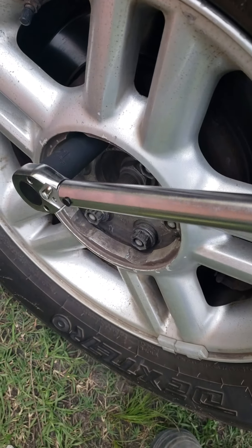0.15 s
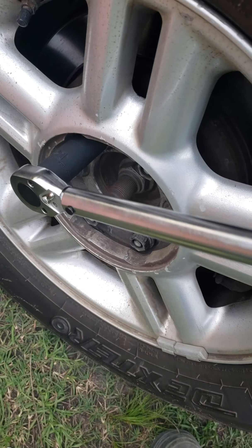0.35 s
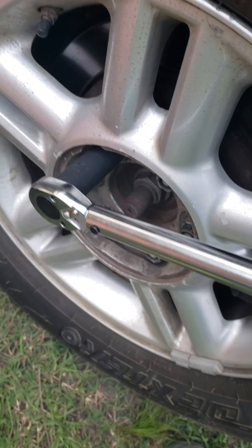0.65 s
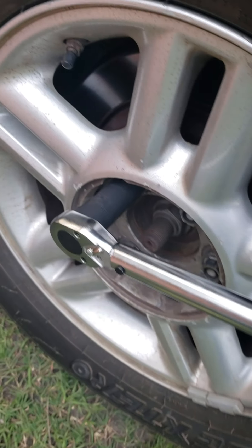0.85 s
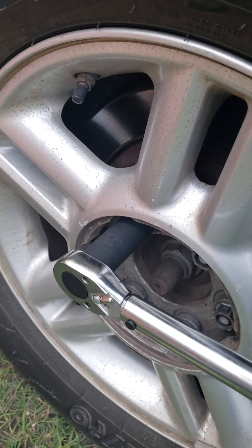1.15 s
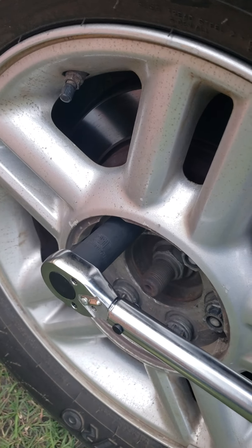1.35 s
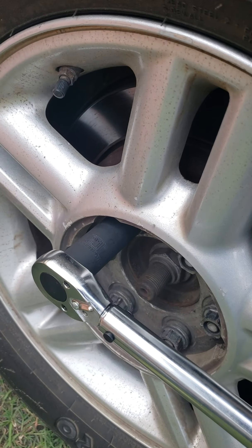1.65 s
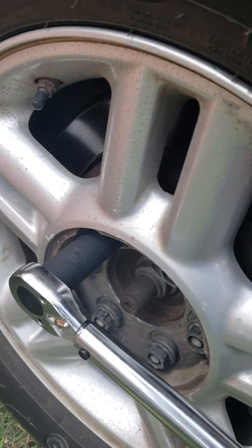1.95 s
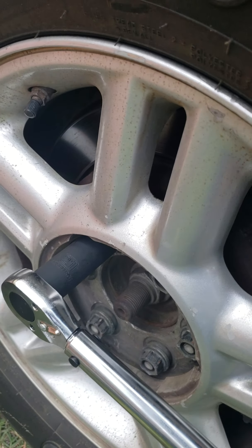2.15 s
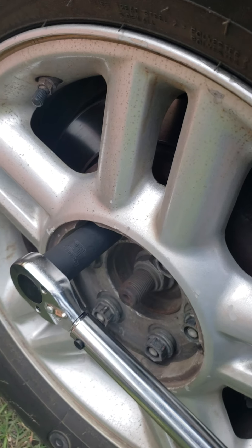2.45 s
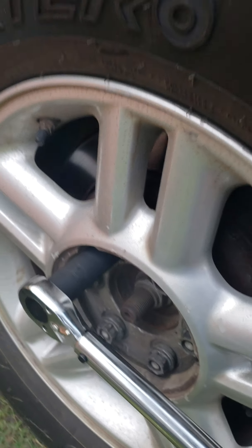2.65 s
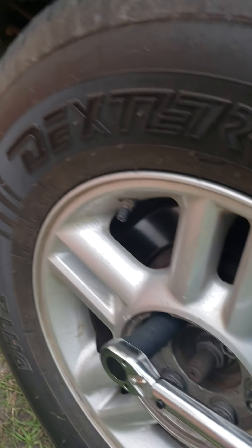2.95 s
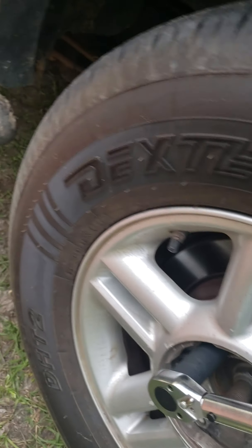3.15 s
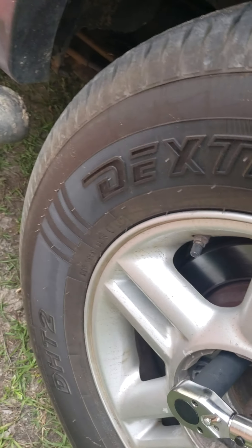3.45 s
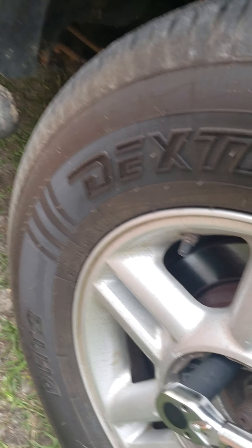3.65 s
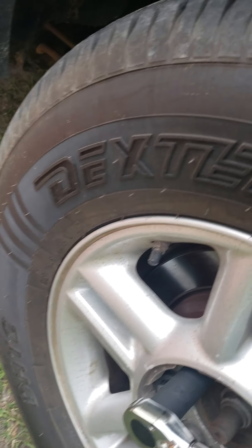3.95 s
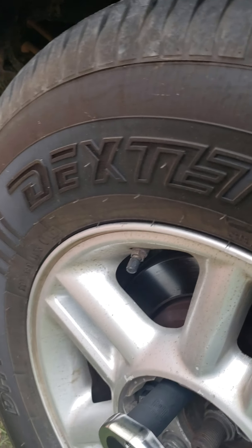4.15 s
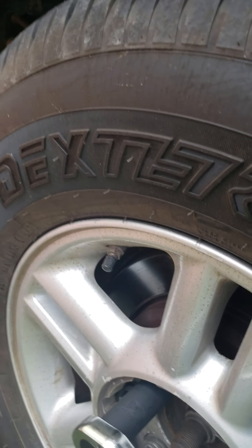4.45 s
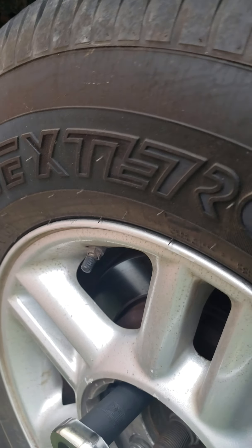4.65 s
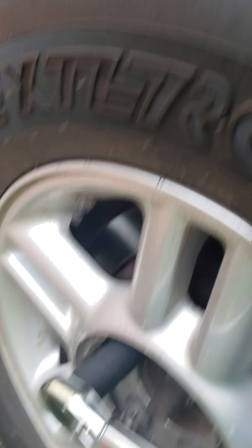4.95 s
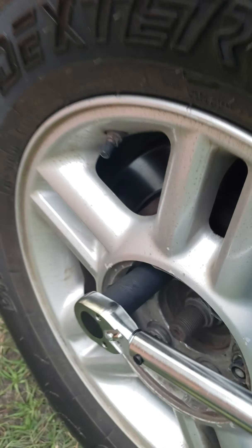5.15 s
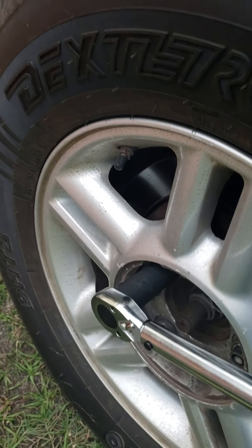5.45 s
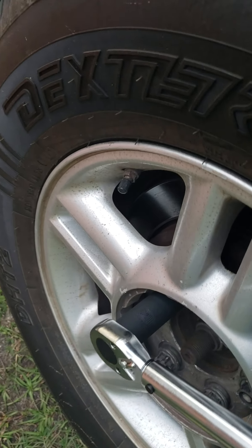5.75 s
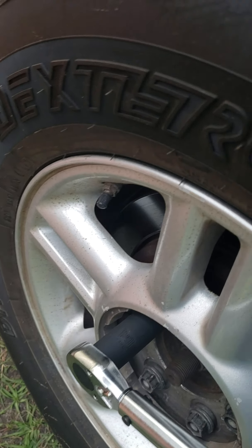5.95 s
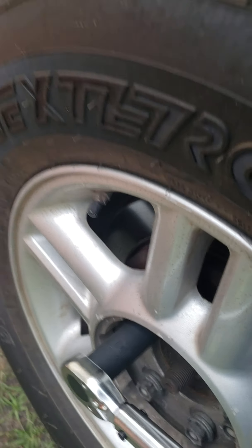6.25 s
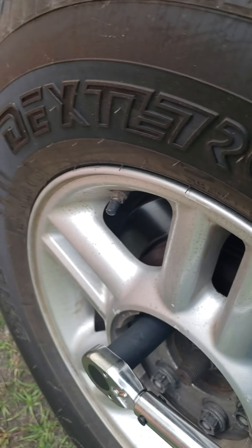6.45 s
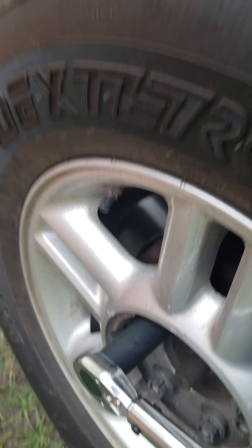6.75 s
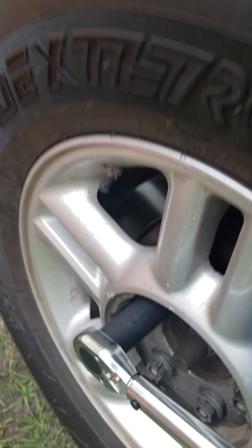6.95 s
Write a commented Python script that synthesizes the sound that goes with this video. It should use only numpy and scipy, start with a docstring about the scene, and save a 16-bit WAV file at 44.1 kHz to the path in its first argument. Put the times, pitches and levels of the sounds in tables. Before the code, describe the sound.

Sharp steel clinks and soft cloth rustling outdoors, until a torque wrench clacks loudly on a car wheel, briefly ringing it.

```python
"""A click-type torque wrench tightens a wheel nut and gives way with a loud clack that rings the wheel.
Before that, the socket scrapes and squeaks and the steel ratchet clinks as the handle is turned and
reset. A sleeve rustles close to a hand-held phone, with a few dull knocks and one dry snap near the end.
It all happens outdoors, over a low rumble and far traffic."""
import sys
import numpy as np
from scipy import signal
from scipy.fft import rfft, irfft, next_fast_len
from scipy.io import wavfile

SR = 44100
rng = np.random.default_rng(int(sys.argv[2]) if len(sys.argv) > 2 else 0)


def wrap_up_sound(samples):
    """Save the sound to the file named by the first command line argument, as 16-bit audio."""
    columns = np.atleast_2d(samples).T
    # keep every value between -1 and 1, then stretch to whole-number steps
    tamed = np.clip(columns, -1, 1)
    steps = np.round(tamed * 32767).astype(np.int16)
    wavfile.write(sys.argv[1], SR, steps)


N = 313683
T = np.arange(N) / SR
RING_TIME = T[:3 * SR // 5]  # time for each blow to die away
STEEL_PEAKS_DB, PEAK_GAP_HZ = 5, 71.03  # how uneven the many tones of struck steel are, and their spacing


# the wrench gives way and bounces (t/s, level/dB)
CLACK_HITS = [(6.101, 0.5), (6.1036, -10.5), (6.104, -15), (6.1089, -11.5), (6.112, -9.5), (6.1218, -22.5),
              (6.134, -27.5)]
# tone colour of the clack: how strong it is from low to high (f/Hz, level/dB)
CLACK_COLOUR = [(120, -23), (230, -17.5), (330, -1), (450, -11.5), (600, -8.5), (1000, -7), (1300, -10.5),
                (1750, -1.5), (2500, -1.5), (3400, -7), (4300, -2), (5000, -10), (8600, -6.5), (10200, 5.5),
                (11800, 1.5), (13000, -9), (16000, -7)]
# tone colour of the clack's tail (f/Hz, level/dB)
TAIL_COLOUR = [(150, -12.5), (320, -1), (850, 3), (1300, -7), (1900, -2), (3000, -3.5), (3400, -11.5),
               (4300, -3.5), (5000, -12.5), (10500, -7.5), (16000, -16)]
# tone colour of the hub's faint after-ring (f/Hz, level/dB)
HUB_COLOUR = [(2500, -27), (2900, -7.5), (3400, -17.5), (4000, -3.5), (4450, 1.5), (5000, -19.5),
              (8000, -33.5)]
# tones of the struck wheel; decay is the time to fade by 60 dB (f/Hz, level/dB, decay/s)
WHEEL_TONES = [(314, -17, 0.38), (387, -20, 0.44), (507, -8, 0.2), (581, -20, 0.77), (586, -22.5, 0.37),
               (567.5, 5, 0.077), (657, -1, 0.11), (750, -16.5, 0.2), (866, -5, 0.28), (1190, -19, 0.33),
               (1720, -3, 0.18), (2180, -6, 0.088), (2880, -17.5, 0.38), (3010, -12, 0.2),
               (3830, -7.5, 0.1), (4120, -9, .12), (4350, -11, .14), (4480, -5.5, 0.1)]
# tones of a dull thud, also heard in the knocks (f/Hz, level/dB, decay/s)
THUD_TONES = [(309.4, -1, 0.065), (333, -1, 0.07), (594, -10, 0.088), (800, -24, 0.14)]
def wrench_clack():
    """Once the nut is tight, a lever slams into the wrench's tube and chatters; the jolt rings the wheel."""
    out = np.zeros((2, N))
    for s, db in CLACK_HITS:
        contact = undb(-5.5) * burst(CLACK_COLOUR, t60=0.0089, rise=0.00013)
        crack = undb(-8) * burst(CLACK_COLOUR, t60=0.034, rise=0.00025)
        add(out, s, undb(db) * (contact + crack))
    wheel = undb(-23.5) * ring(WHEEL_TONES, rise=0.0038)
    tail = undb(-21.5) * burst(TAIL_COLOUR, t60=0.16, rise=0.0063, peaky_db=STEEL_PEAKS_DB)
    hub = undb(-47) * burst(HUB_COLOUR, t60=0.45, peaky_db=5.5)
    thud = undb(-14) * ring(THUD_TONES, rise=0.0076)
    add(out, CLACK_HITS[0][0], wheel + tail + hub + thud)
    return out


# steel clinks; the last four columns add to the level (t/s, level/dB, body/dB, pawl/dB, socket/dB, nut/dB)
RATCHET_CLINKS = [(0.0499, -52.5, 4, -35, -47, -32), (2.903, -27, -7.5, -21.5, -50.5, -42.5),
                  (3.0117, -17, -0.5, -32, -40.5, -24.5), (3.0214, -8, -4.5, -19.5, -28, -25),
                  (3.1366, -24, 4, -19.5, -37.5, -29), (3.149, -8.5, -5.5, -19.5, -22, -38),
                  (3.409, -55, 11, -15, -35, -35), (3.514, -39, 7, -8.5, -42, -45)]
# loose parts bounce, too briefly to ring (t/s, level/dB)
BOUNCES = [(3.0132, -17.5), (3.0146, -20), (3.0165, -19.5), (3.0305, -25.5), (3.1335, -34), (3.1538, -20.5),
           (3.161, -24.5), (3.517, -38), (3.548, -46)]
# light touches that ring the tool (t/s, level/dB)
TOUCHES = [(3.477, -56), (4.346, -61.5)]
# tone colour of a clink's bright crack (f/Hz, level/dB)
BRIGHT_COLOUR = [(2000, -41), (5000, -11), (8500, -12), (10000, -11.5), (11800, 4), (13200, -6.5),
                 (15000, 1), (17000, -19)]
# tone colour of a clink's duller body (f/Hz, level/dB)
BODY_COLOUR = [(300, -20.5), (800, -12), (1300, -17), (2200, 1), (3500, -4), (5000, 1.5), (7000, -8),
               (11000, -2.5), (16000, 0.5)]
# tones of the pawl, the small catch that grips the ratchet's teeth (f/Hz, level/dB, decay/s)
PAWL_TONES = [(1270, -28.5, .09), (2474, -24.5, 0.17), (2563, -22.5, .12), (9740, -6, 0.14),
              (9840, 1, 0.053), (10560, 0, 0.037), (11750, -10.5, 0.063)]
# tones of the socket, the cup that fits over the nut (f/Hz, level/dB, decay/s)
SOCKET_TONES = [(860, -21.5, 0.27), (2440, -12, 0.11), (3300, -17.5, 0.11), (3790, -6.5, 0.11),
                (3810, -16.5, .16), (4440, 0, 0.13)]
# tones of the wheel nut (f/Hz, level/dB, decay/s)
NUT_TONES = [(5082, -13, 0.38), (5238, -5, 0.09), (5300, -6.5, .08)]
# tones of the whole tool (f/Hz, level/dB, decay/s)
TOOL_TONES = [(3940, -16, 0.27), (6510, -2.5, 0.15), (9500, -11, 0.088), (13600, 6, 0.11)]
def ratchet():
    """Steel hits steel and bounces: a bright crack, a duller body, and pawl, socket and nut ringing."""
    out = np.zeros((2, N))
    for s, db, body_db, pawl_db, socket_db, nut_db in RATCHET_CLINKS:
        contact = undb(4.5) * burst(BRIGHT_COLOUR, t60=0.0063, rise=0.0003)
        crack = undb(-3) * burst(BRIGHT_COLOUR, t60=0.02, rise=0.00042)
        crack += undb(-19) * burst(BRIGHT_COLOUR, t60=0.088, peaky_db=STEEL_PEAKS_DB)
        body = undb(-17) * burst(BODY_COLOUR, t60=0.016)
        body += undb(-18.5) * burst(BODY_COLOUR, t60=0.14, rise=0.0041, peaky_db=STEEL_PEAKS_DB)
        pawl = undb(pawl_db) * ring(PAWL_TONES)
        socket = undb(socket_db) * ring(SOCKET_TONES, rise=0.014)
        nut = undb(nut_db) * ring(NUT_TONES)
        add(out, s, undb(db) * (contact + crack + undb(body_db) * body + pawl + socket + nut))
    for s, db in BOUNCES:
        contact = undb(3.5) * burst(BRIGHT_COLOUR, t60=0.008)
        body = undb(-17) * burst(BODY_COLOUR, t60=0.03)
        add(out, s, undb(db) * (contact + body))
    for s, db in TOUCHES:
        add(out, s, undb(db) * (ring(TOOL_TONES) + burst(BODY_COLOUR, t60=0.16)))
    return out


# single ratchet clicks; the last two columns add to the level (t/s, level/dB, ring/dB, body/dB)
TOOTH_CLICKS = [(1.2423, -40.5, 1, -10), (4.1326, -41.5, 5, -6.5)]
# tone colour of the pawl's crack (f/Hz, level/dB)
PAWL_COLOUR = [(1000, -33), (2400, -21.5), (3700, -7), (4600, -12), (5600, -15), (8300, -13), (9300, 0),
               (10600, 3), (12300, 2.5), (13000, -9), (16000, -13)]
def pawl_clicks():
    """The pawl drops over one tooth and rings."""
    out = np.zeros((2, N))
    for s, db, ring_db, body_db in TOOTH_CLICKS:
        crack = undb(7.5) * burst(PAWL_COLOUR, t60=0.03, rise=0.00046)
        tail = undb(-8.5) * burst(PAWL_COLOUR, t60=0.16, peaky_db=STEEL_PEAKS_DB)
        pawl = undb(ring_db) * ring(PAWL_TONES)
        body = undb(body_db) * burst(BODY_COLOUR, t60=0.02)
        add(out, s, undb(db) * (crack + tail + pawl + body))
    return out


# the socket taps the nut (t/s, level/dB)
SOCKET_TAPS = [(0.419, -69), (0.4605, -60), (0.4758, -51)]
# tones of each tap (f/Hz, level/dB, decay/s)
PING_TONES = [(603, -8.5, 0.18), (870, -14.5, 0.32), (2780, 1, 0.034), (3860, -6, 0.1), (3950, 1, .02),
              (5950, -5, .022)]
# tone colour of a gritty scrape, also heard in the knocks (f/Hz, level/dB)
GRIT_COLOUR = [(150, -0.5), (350, -6.5), (700, 6.5), (1050, -3.5), (1600, 2), (2300, -7), (3000, -12),
               (6000, -18.5), (15000, -27.5)]
def socket_taps():
    """The socket settles on the nut with short pings."""
    out = np.zeros((2, N))
    for s, db in SOCKET_TAPS:
        ping = undb(-1.5) * ring(PING_TONES)
        grit = undb(1.5) * burst(GRIT_COLOUR, t60=0.025)
        body = undb(-3) * burst(BODY_COLOUR, t60=0.02)
        add(out, s, undb(db) * (ping + grit + body))
    return out


# the socket scrapes round as the nut starts to turn (t/s, length/s, level/dB)
SOCKET_SCRAPES = [(0.489, 0.39, -70)]
# rough tones of the scrape (f/Hz, width/Hz, level/dB)
SCRAPE_TONES = [(1900, 450, 4), (2230, 510, 3.5), (3000, 980, -2.5), (3750, 550, -7)]
def socket_scrape(sag_per_s=0.08):
    """Rubbing keeps a few rough tones of the socket sounding; they sink a little as the turn slows."""
    out = np.zeros((2, N))
    for s, length, level_db in SOCKET_SCRAPES:
        slowing_time = np.cumsum(np.exp(-sag_per_s * np.maximum(T - s, 0))) / SR
        tones = np.zeros(N)
        for hz, width, db in SCRAPE_TONES:
            phase = 2 * np.pi * hz * slowing_time
            tones += undb(db) * (wander(width) * np.cos(phase) + wander(width) * np.sin(phase))
        out += undb(level_db) * held(s, length, rise=0.022, t60=0.47) * tones / 2
    return out


# short dry squeaks, each with its starting pitch (t/s, f/Hz, level/dB)
SOCKET_SQUEAKS = [(4.262, 2050, -51.5), (4.335, 1866, -45.5)]
def socket_squeaks(fall_per_s=1.5, roughness=0.11):
    """Steel sticks and slips for a moment: a rough note that falls as the slip slows."""
    out = np.zeros((2, N))
    shape = fade(t60=0.13, rise=0.019)
    t = T[:len(shape)]
    for s, hz, db in SOCKET_SQUEAKS:
        jitter = 1 + roughness * wander(900)[:len(t)]
        pitch = hz * np.exp(-fall_per_s * t) * jitter
        note = undb(db) * shape * np.sin(2 * np.pi * np.cumsum(pitch) / SR)
        add(out, s, np.array([note, note]))
    return out


# dull knocks, with a level for each of their two parts (t/s, thud/dB, grit/dB)
DULL_KNOCKS = [(0.476, -53.5, -53.5), (2.783, -56, -57), (2.865, -48, -57.5), (3.025, -49, -47),
               (3.155, -52.5, -52), (3.518, -63, -55.5), (3.536, -49, -44.5), (3.543, -45, -51),
               (3.562, -47, -65.5), (5.756, -48.5, -61.5), (6.638, -37.5, -71), (6.816, -48, -56),
               (6.924, -46, -60), (7.0029, -23.5, -60)]
def knocks():
    """The load shifts: soft, low bumps with a short gritty scrape."""
    out = np.zeros((2, N))
    for s, thud_db, grit_db in DULL_KNOCKS:
        thud = undb(thud_db) * ring(THUD_TONES, rise=0.008)
        grit = undb(grit_db) * burst(GRIT_COLOUR, t60=0.15, rise=0.0057, peaky_db=3)
        add(out, s, thud + grit)
    return out


# tone colour of the snap at the left microphone (f/Hz, level/dB)
SNAP_LEFT_COLOUR = [(200, -9), (800, -1), (1300, 12), (1800, 18.5), (2400, 12.5), (3200, 4), (4200, 17),
                    (5400, 13.5), (6500, 5.5), (7900, -22), (9500, -0.5), (13000, -9), (15500, 1)]
# tone colour of the snap at the right microphone (f/Hz, level/dB)
SNAP_RIGHT_COLOUR = [(300, 3), (1000, -12), (2000, -15), (3900, -4), (5500, -14), (9500, -13), (10800, 1.5),
                     (11900, 14), (13400, 4), (15300, 15), (16500, -0.5)]
def snap(start_s=6.8159, left_delay_s=0.00024):
    """One very short, dry tick right at the phone: full on the left, thin and bright on the right."""
    out = np.zeros((2, N))
    left_only, right_only = np.array([[1], [0]]), np.array([[0], [1]])
    add(out, start_s + left_delay_s, undb(-0.5) * tick(SNAP_LEFT_COLOUR) * left_only)
    add(out, start_s, undb(1.2) * tick(SNAP_RIGHT_COLOUR) * right_only)
    return out


# one stroke for each move of the arm, timed at its middle (t/s, length/s, level/dB, pressure/0-1)
SLEEVE_STROKES = [(0.984, .11, -56.5, 0.65), (1.127, 0.12, -58.5, 0.89), (1.419, 0.3, -50.5, 0.06),
                  (1.644, 0.17, -51, 0.32), (1.882, 0.23, -55, 0.1), (2.063, .15, -50, 0.33),
                  (2.292, 0.28, -49.5, 0.58), (2.408, 0.14, -46.5, 0.68), (2.795, 0.58, -58.5, 0.59),
                  (3.525, 0.31, -69.5, 0.66), (3.757, 0.084, -50.5, 0.68), (3.971, 0.32, -53, 0.58),
                  (4.074, 0.11, -54.5, 0.65), (4.8, 0.5, -73.5, .3), (5.037, .13, -64.5, 0.64),
                  (5.227, 0.27, -55, 0.59), (5.345, 0.23, -54.5, 0.76), (5.587, 0.17, -62, 0.68),
                  (5.797, 0.13, -55, 0.61), (5.999, 0.36, -60, 0.24), (6.166, 0.15, -40.5, 0.69),
                  (6.404, 0.16, -60, 0.63), (6.679, 0.17, -44.5, 0.78), (6.89, 0.46, -55, 0.82),
                  (7.046, 0.088, -45.5, 0.53)]
# hard rubbing as the arm gives way and comes back (t/s, length/s, level/dB)
SLEEVE_SCUFFS = [(6.11, .11, -45.5), (6.603, .12, -52), (6.744, 0.23, -61.5)]
# small snags of the cloth (t/s, level/dB)
SLEEVE_SNAGS = [(3.728, -42.5), (5.389, -42), (5.529, -51), (5.724, -54), (6.028, -42.5), (6.405, -41),
                (6.423, -45.5), (6.5915, -35.5), (7.045, -33.5)]
# tone colour of lightly sliding cloth (f/Hz, level/dB)
HISS_COLOUR = [(5000, -45.5), (8500, -18), (10200, -5), (12000, 0.5), (15200, 1.5), (16000, -9),
               (17000, -33)]
# tone colour of pressed cloth (f/Hz, level/dB)
SWISH_COLOUR = [(2000, -18), (4000, -10.5), (5500, -11), (7500, 1), (10000, -0.5), (13000, -13),
                (16000, -19.5)]
# tone colour of hard rubbing (f/Hz, level/dB)
RUB_COLOUR = [(120, 6.5), (300, 4.5), (600, -1), (900, -5), (1200, 0.5), (1500, -5), (2200, -5.5),
              (3200, -10.5), (4300, -8), (6500, -6.5), (12000, -26.5)]
def sleeve(resting_db=-81.5, light_touch_db=-32.5):
    """Sliding cloth makes a grainy hiss, swishes lower when pressed, scuffs, and snags now and then."""
    grain = undb(0.51 * wander(40) + 1.9 * wander(1100))
    hiss_power, swish_power = undb(resting_db) ** 2, 0
    for middle, length, db, pressure in SLEEVE_STROKES:
        stroke = undb(db) * swell(middle, length)
        swish_share = undb(light_touch_db * (1 - np.clip(pressure, 0, 1)))
        hiss_power += stroke ** 2
        swish_power += (stroke * swish_share) ** 2
    scuffs = sum(undb(db) * held(s, length, rise=0.042, t60=0.26) for s, length, db in SLEEVE_SCUFFS)
    hiss = np.sqrt(hiss_power) * noise(HISS_COLOUR, N)
    swish = undb(-1.5) * np.sqrt(swish_power) * noise(SWISH_COLOUR, N)
    out = grain * (hiss + swish + scuffs * noise(RUB_COLOUR, N))
    for s, db in SLEEVE_SNAGS:
        high = burst(HISS_COLOUR, t60=0.025, rise=0.00047)
        low = undb(-10.5) * burst(SWISH_COLOUR, t60=0.015, rise=0.00055)
        add(out, s, undb(db) * (high + low))
    return out


# loudness of the low rumble over time (t/s, level/dB)
RUMBLE_LOUDNESS = [(0.0, -57.5), (1.54, -60.5), (1.86, -48), (2.16, -51), (2.77, -51.5), (2.85, -45.5),
                   (3.19, -61.5), (3.42, -54), (3.54, -60.5), (3.57, -48), (4.0, -62), (5.94, -52.5),
                   (6.0, -46), (6.08, -52.5), (6.1, -43.5), (6.36, -53.5), (7.11, -44.5)]
# tone colour of the rumble (f/Hz, level/dB)
RUMBLE_COLOUR = [(20, -25), (54, -5), (75, 0), (130, -9.5), (195, -17), (295, -23), (386, -38), (600, -48),
                 (780, -76), (1320, -120)]
# loudness of the far traffic over time (t/s, level/dB)
TRAFFIC_LOUDNESS = [(0, -78.5), (1.3, -75.5), (2.0, -71), (2.8, -70), (3.4, -74), (4.7, -78), (6.0, -70),
                    (7.11, -67.5)]
# tone colour of the traffic (f/Hz, level/dB)
TRAFFIC_COLOUR = [(200, -1), (550, -5.5), (950, -0.5), (1300, -6.5), (1700, -5.5), (2500, -11),
                  (5000, -14.5), (9000, -22), (16000, -8.5)]
def outdoors():
    """A low unsteady rumble under the thin wash of far traffic."""
    rumble_db = np.interp(T, *np.transpose(RUMBLE_LOUDNESS)) + wander(11)
    traffic_db = np.interp(T, *np.transpose(TRAFFIC_LOUDNESS)) + 0.52 * wander(4.4)
    rumble = undb(rumble_db) * noise(RUMBLE_COLOUR, N)
    traffic = undb(traffic_db) * noise(TRAFFIC_COLOUR, N, apart_hz=800)
    return rumble + traffic


def undb(db):
    """Turn decibels into a number to multiply a sound by."""
    return 10 ** (np.asarray(db) / 20)


def colour(points, size):
    """Join (f/Hz, level/dB) points into a gain for every frequency of a sound of this size."""
    hz, db = np.transpose(points)
    all_hz = np.arange(size // 2 + 1) * SR / size
    return undb(np.interp(np.log(all_hz + 1), np.log(hz), db))


def noise(points, size, apart_hz=1500, peaky_db=0):
    """Noise of a given colour, with random peaks if asked; left and right part ways above apart_hz."""
    padded = next_fast_len(size, real=True)
    hz = np.arange(padded // 2 + 1) * SR / padded
    mid, side = rfft(rng.standard_normal((2, padded)))
    peaks = rng.standard_normal(size=1024)
    peaks_db = peaky_db * np.interp(hz / PEAK_GAP_HZ, np.arange(len(peaks)), peaks)
    gain = colour(points, padded) * undb(peaks_db)
    width = np.clip(0.16 + hz / (hz + apart_hz), 0, 1)
    stereo = np.array([mid + width * side, mid - width * side]) / np.hypot(1, width)
    sound = irfft(stereo * gain, padded)
    return sound[:, :size] / sound.std()


def wander(rate):
    """A random drift of about 1 either way, heading for a new value `rate` times a second."""
    values = rng.standard_normal(int(N / SR * rate) + 2)
    return np.interp(T * rate, np.arange(len(values)), values)


def fade(t60, rise):
    """Loudness of a blow: a quick rise, then a fall of 60 dB in t60 seconds."""
    t = RING_TIME[RING_TIME < t60]
    return (1 - np.exp(-t / rise)) * np.exp(-np.log(1000) * t / t60)


def swell(middle, length, edge_db=10.5, curve=1.5):
    """Loudness of a stroke: the cloth speeds up and slows again, edge_db quieter at each end."""
    from_middle = np.abs(2 * (T - middle) / length)
    return undb(-np.minimum(edge_db * from_middle ** curve, 100))


def held(start, length, rise, t60):
    """Loudness of a rub: it rises, holds, then dies away."""
    t = np.maximum(T - start, 0)
    return (1 - np.exp(-t / rise)) * np.exp(-np.log(1000) * np.maximum(t - length, 0) / t60)


def burst(points, t60, rise=0.00017, peaky_db=0):
    """A puff of noise: countless close tones dying together."""
    shape = fade(t60, rise)
    return noise(points, len(RING_TIME), peaky_db=peaky_db) * np.pad(shape, (0, len(RING_TIME) - len(shape)))


def ring(tones, rise=0.00042, scatter_db=0.0, apart_hz=3000):
    """The fading tones of a struck part; high ones reach the two microphones out of step."""
    out = np.zeros((2, len(RING_TIME)))
    for hz, db, t60 in tones:
        shape = undb(db + scatter_db * rng.standard_normal()) * fade(t60, rise)
        phase = min(hz / apart_hz, 1) * rng.uniform(-np.pi, np.pi, (2, 1)) / 2
        out[:, :len(shape)] += shape * np.sin(2 * np.pi * hz * RING_TIME[:len(shape)] + phase)
    return out


def tick(points, size=2048):
    """The shortest click that has the given tone colour."""
    cepstrum = irfft(np.log(colour(points, size)))
    # folding the second half onto the first packs the sound at the very start
    cepstrum[1:size // 2] *= 2
    cepstrum[size // 2 + 1:] = 0
    return irfft(np.exp(rfft(cepstrum)))


def add(out, s, sound):
    """Mix a sound in at s seconds."""
    start = int(s * SR)
    out[:, start:start + sound.shape[1]] += sound[:, :N - start]


# dulling at the left microphone, which faces away from the work (f/Hz, level/dB)
LEFT_SHADE = [(100, 0.5), (900, 0), (3800, 1), (5500, -7), (7000, -14.5), (8400, -28.5), (9800, -18),
              (12000, -17), (14500, -7.5), (16000, -11.5)]
def scene(left_delay_s=0.0002):
    """The work is nearer the right microphone; the left hears it a little later and duller."""
    tool = ratchet() + pawl_clicks() + socket_taps() + socket_scrape() + socket_squeaks() + wrench_clack()
    left, right = tool + knocks() + sleeve()
    size = next_fast_len(N + SR // 10, real=True)
    hz = np.arange(size // 2 + 1) * SR / size
    delay = np.exp(-2j * np.pi * left_delay_s * hz)
    left = irfft(rfft(left, size) * delay * colour(LEFT_SHADE, size), size)[:N]
    return np.array([left, right]) + snap() + outdoors()


def record(dry, bottom_hz=32, top_hz=16200):
    """The phone drops the deepest bass, rounds off the loudest peaks and cuts the highest treble."""
    bass_cut = signal.butter(2, bottom_hz, "high", fs=SR, output="sos")
    treble_cut = signal.ellip(8, 0.2, 70, top_hz, fs=SR, output="sos")
    rounded = 1.296 * np.tanh(signal.sosfilt(bass_cut, dry) / 1.298)
    return signal.sosfilt(treble_cut, rounded)


dry = scene()
out = record(dry)
wrap_up_sound(out)
```